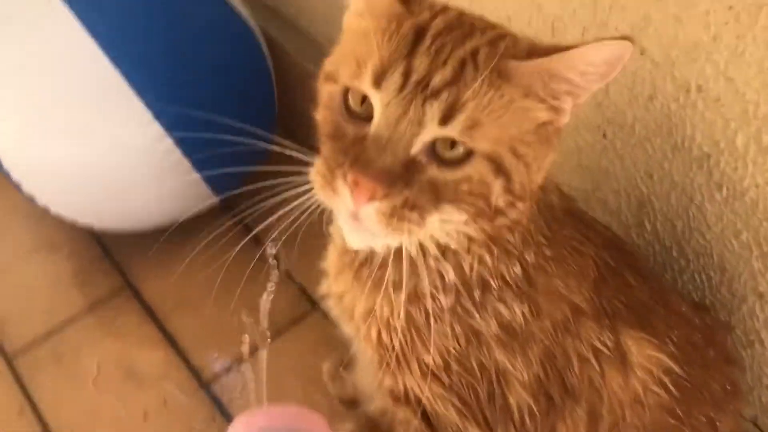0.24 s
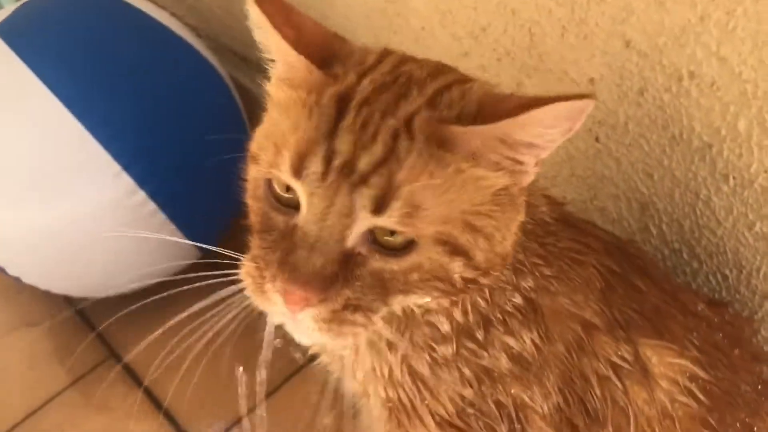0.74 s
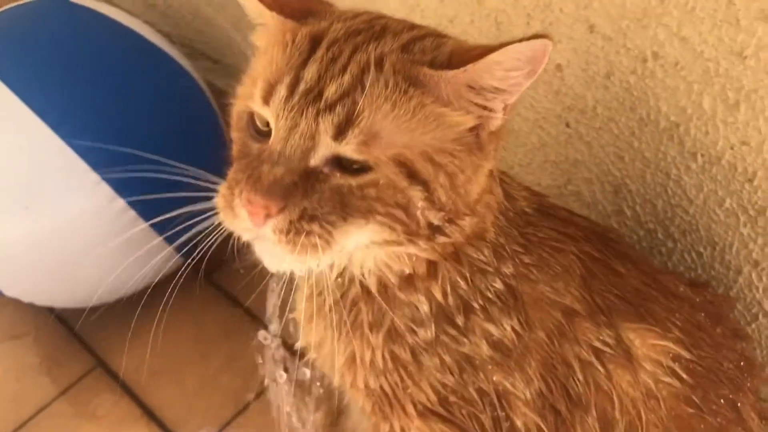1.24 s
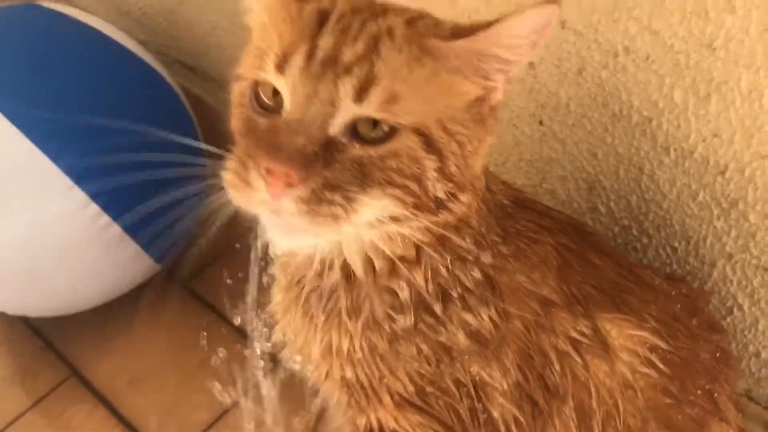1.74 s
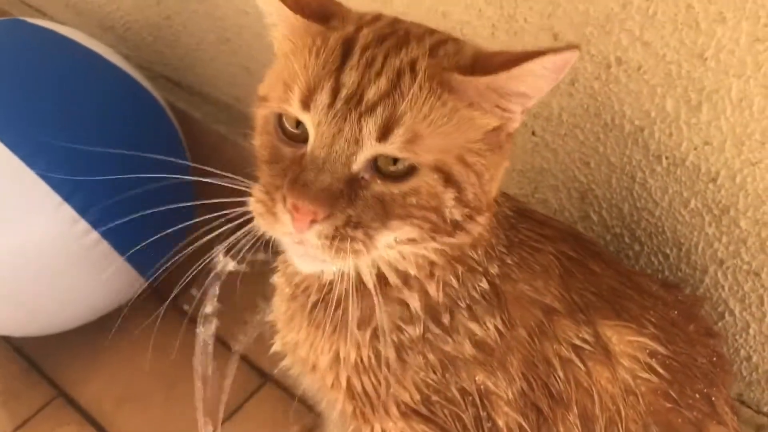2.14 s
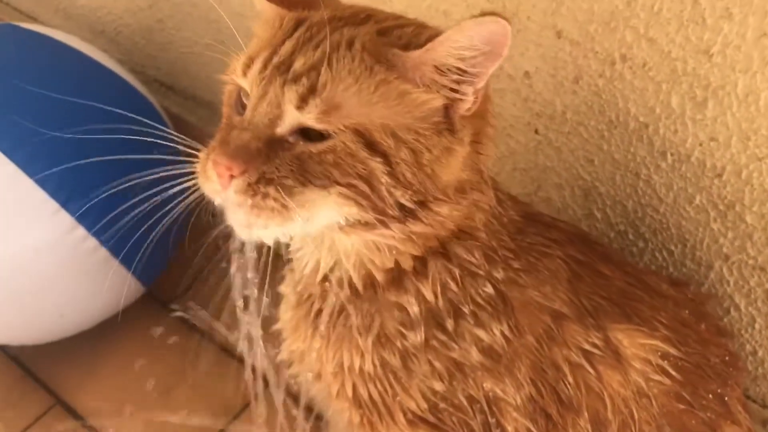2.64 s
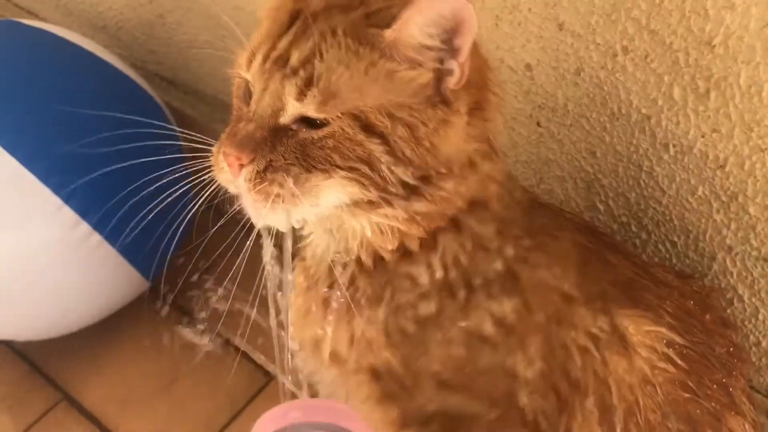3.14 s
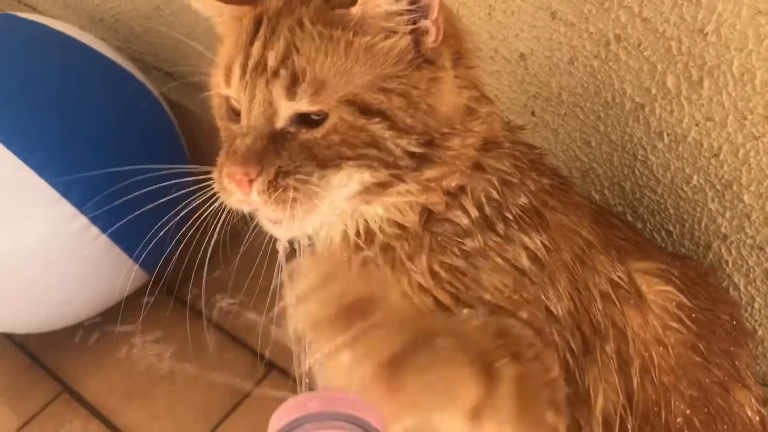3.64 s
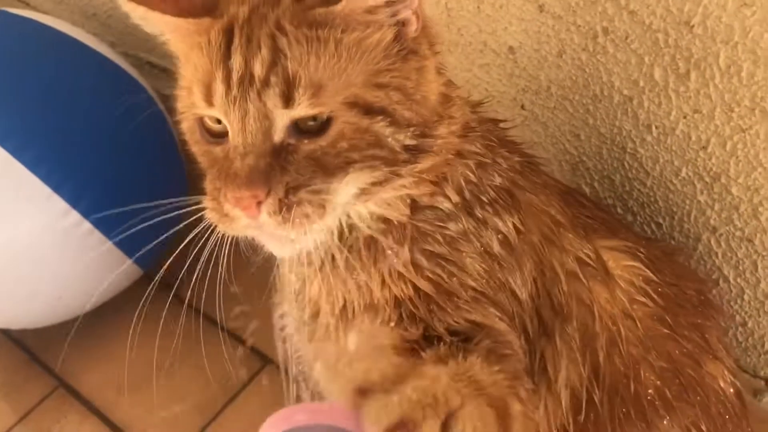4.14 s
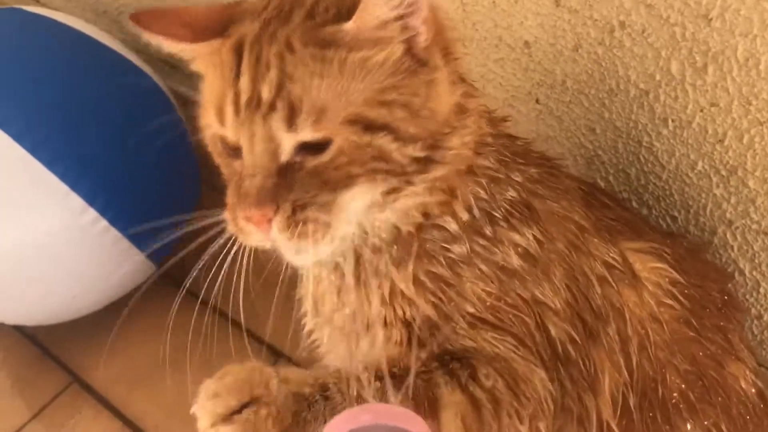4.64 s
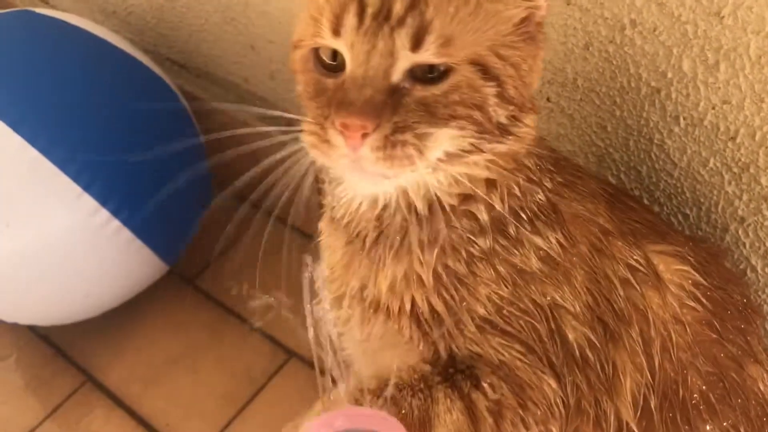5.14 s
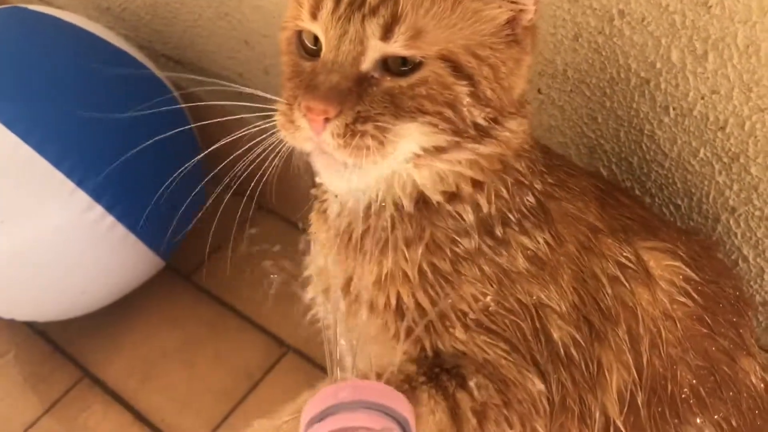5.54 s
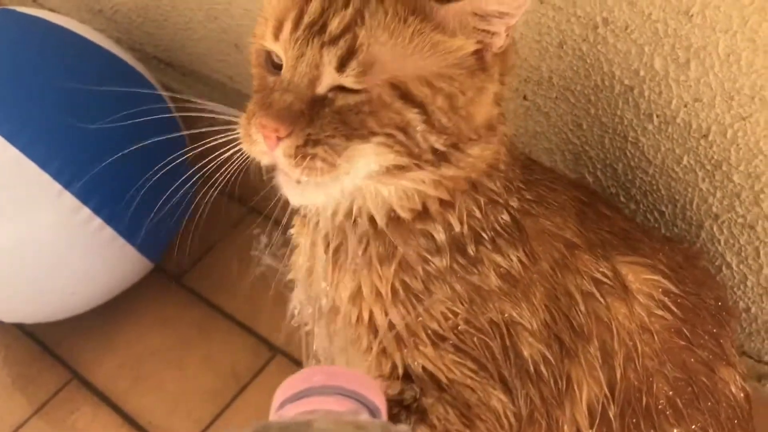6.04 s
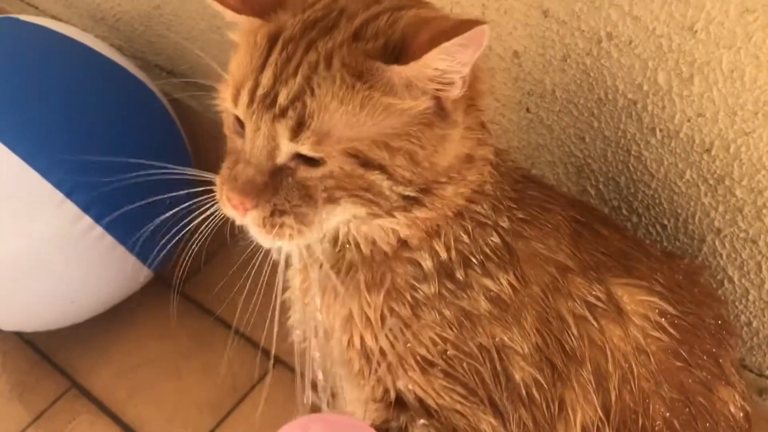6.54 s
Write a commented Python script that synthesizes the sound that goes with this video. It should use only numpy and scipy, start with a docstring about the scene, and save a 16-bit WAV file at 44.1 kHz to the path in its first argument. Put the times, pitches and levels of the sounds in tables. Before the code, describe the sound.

In an outdoor patio corner, a close mono microphone picks up a plastic bottle crackling sparsely as a hand squirts water from it. Light, bright drop ticks, a few tiny bubbles and a barely audible hiss accompany the clicks. From about halfway, sharp, slightly hollow pops break in, with a brief finger rub and a short puff of air before the last and strongest pop. A soft, low rumble continues far behind.

```python
"""A thin plastic water bottle, squeezed close to the microphone, squirts at a cat in a patio corner.
Its wall buckles with a few sharp pops and many small crease ticks, and fingers rub on the plastic.
The jets hiss faintly, air puffs through the cap, drops tick nearby and a few bubbles ring.
Tiles and walls answer briefly; a low outdoor rumble lies far behind. One microphone, mono."""
import sys
import numpy as np
from scipy import signal
from scipy.fft import rfft, irfft, next_fast_len
from scipy.io import wavfile
from scipy.ndimage import map_coordinates

SR = 44100
rng = np.random.default_rng(int(sys.argv[2]) if len(sys.argv) > 2 else 0)


def wrap_up_sound(samples):
    """Save the sound to the file named by the first command line argument, as 16-bit audio."""
    columns = np.atleast_2d(samples).T
    # keep every value between -1 and 1, then stretch to whole-number steps
    tamed = np.clip(columns, -1, 1)
    steps = np.round(tamed * 32767).astype(np.int16)
    wavfile.write(sys.argv[1], SR, steps)


N = 299880
RING = SR // 2  # samples that one snap and its echo last

# Dents buckling in the wall. Each row: start in seconds, level in dB, low and high band edge in Hz,
# first note in Hz, its boost in dB, second note in Hz, its width in Hz, its boost in dB,
# hollow after-ring in dB against the pop.
DENTS = [(2.8696, -26.5, 510, 4670, 800, 23.5, 4200, 2590, 16, -26),
         (2.8740, -47, 600, 6000, 860, 17, 6700, 500, 14, -21),
         (4.0424, -44.5, 330, 2400, 1130, 17, 1450, 150, 13, -4),
         (4.1466, -33, 476, 3600, 930, 16.5, 3360, 700, 5, -13),
         (4.1546, -39, 500, 1200, 920, 19, 644, 100, 17, -22),
         (4.6261, -41, 230, 3740, 320, 18, 3010, 1500, 1, -5),
         (4.6402, -19.5, 736, 8000, 288, 21.5, 6550, 498, 9.5, -12.5),
         (5.8250, -58.5, 700, 3000, 1280, 5.5, 1910, 200, -8, -22),
         (6.1964, -12, 290, 9120, 499.6, 10, 4054, 170, 14, -20.5),
         (6.6687, -52.5, 910, 3200, 1186, 15, 3400, 300.5, 11.5, -30)]


def pops(lag_s=.00125, crack_db=-18, shudder_db=-13, echo_db=-21.5):
    """A dent flips through: an impulse rings the wall, which shudders against the water and the hand."""
    # The bottle's modes. Each row: pitch in Hz, width in Hz, relative level in dB.
    wall_modes = [(190, 90, -12), (310, 100, -9), (405, 60, -6), (535, 60, -8), (645, 55, -6),
                  (870, 120, -4), (1130, 150, -2), (1360, 115, 3), (1760, 105, 1), (2070, 110, -5),
                  (2560, 200, -8), (3370, 160, -8), (4480, 300, -14), (5400, 240, -14), (6250, 340, -14),
                  (6750, 320, -13), (7230, 380, -12), (8830, 360, -16), (10050, 330, -17),
                  (10700, 300, -18), (12100, 400, -26), (13800, 1200, -25)]
    out, hz = np.zeros(N), np.fft.rfftfreq(RING, 1 / SR)
    # bending waves disperse: the treble arrives first, 1 kHz after lag_s
    travel = np.exp(-4j * np.pi * lag_s * np.sqrt(1000 * hz))
    wall = travel * sum(amp(db) * resonance(hz, centre, width) for centre, width, db in wall_modes)
    for s, db, low_hz, high_hz, note_hz, note_db, second_hz, second_width, second_db, hollow_db in DENTS:
        first_note = (amp(note_db) - 1) * resonance(hz, note_hz, .14 * note_hz)
        second_note = (amp(second_db) - 1) * resonance(hz, second_hz, second_width)
        ring = sized(irfft(wall * (1 + first_note + second_note), RING))
        crack = sized(filtered(burst(t60=.02, attack_s=.00028), lambda f: 1 / (1 + 1j * f / 3500)))
        pop = sized(filtered(ring + amp(crack_db) * crack, lambda f: band(f, low_hz, high_hz)))
        smeared = signal.fftconvolve(pop, burst(t60=.06, attack_s=.0037))[:RING]
        shudder = filtered(smeared, lambda f: band(f, 200, 1900))
        # the air and water inside boom briefly
        hollow = sized(filtered(burst(t60=.17, attack_s=.0026), lambda f: band(f, 250, 280)))
        direct = pop + amp(shudder_db) * shudder + amp(hollow_db) * hollow
        # the patio hears the bottle from all sides, so much of its answer has a smooth colour
        all_round = sized(irfft(band(hz, .64 * low_hz, .83 * high_hz) / (1 + 1j * hz / 1900), RING))
        answer = amp(-1) * patio_echo(all_round) + amp(-4.5) * patio_echo(pop)
        add(out, s, amp(db) * (direct + amp(echo_db) * answer))
    return out


def thumps(pitch_hz=150, t60=.038, against_pop_db=-22):
    """Each dent shoves the air once: a low, soft thump under the pop."""
    out, t = np.zeros(N), np.arange(RING) / SR
    push = sized(np.sin(2 * np.pi * pitch_hz * t) * amp(-60 * t / t60))
    for s, db, *_ in DENTS:
        add(out, s, amp(db + against_pop_db) * push)
    return out


def creases(strain_s=.2, strain_db=-53, strain_hz=6200, echo_db=-10.5):
    """Small folds in the plastic click; two faint ticks lead up to each pop as the wall strains."""
    # Snapping folds. Each row: start in seconds, level in dB, pitch in Hz, width in octaves.
    folds = [(0.578, -35.5, 10400, .34), (1.032, -23.5, 7140, 0.46), (1.675, -38.5, 8740, .19),
             (1.906, -47, 6360, 0.39), (2.5203, -26, 6430, 0.32), (2.9918, -38.5, 5040, .23),
             (3.0001, -32, 7260, 0.65), (3.8177, -25.5, 6500, 0.3), (3.997, -42, 4330, .08),
             (4.011, -36, 4350, .06), (4.136, -41, 4570, .79), (4.145, -34.5, 7000, .5),
             (4.2824, -37.5, 9980, .46), (5.553, -41.5, 8200, 0.13), (5.907, -43, 6000, 0.48),
             (6.599, -42.5, 8000, .2)]
    out = np.zeros(N)
    for s, db, pitch_hz, octaves in folds:
        add(out, s, amp(db) * tick(pitch_hz, octaves, t60=.01, skirt_db=-13, echo_db=echo_db))
    for pop_s, *_ in DENTS:
        for lead_s, (size, detune) in zip(rng.uniform(0, strain_s, 2), rng.standard_normal((2, 2))):
            pitch_hz = strain_hz * 2 ** (.25 * detune)
            click = tick(pitch_hz, octaves=.18, t60=.008, skirt_db=-14.5, echo_db=echo_db)
            add(out, pop_s - lead_s, amp(strain_db + 3 * size) * click)
    return out


def drops(spray_count=70, spray_db=-54):
    """Large drops land near the microphone as dry, bright ticks; finer spray falls at random."""
    # Large drops. Each row: start in seconds, level in dB, pitch in Hz.
    landings = [(1.3546, -41, 14200), (1.644, -39, 15000), (2.035, -41, 11100), (3.023, -38, 14800),
                (3.16, -45, 12000), (4.1737, -37, 14200), (4.3211, -32, 11300), (5.422, -39.5, 12500),
                (5.6335, -38, 14000), (5.8244, -31.5, 14940), (6.4112, -28.5, 14300), (6.682, -44, 14700)]
    out = np.zeros(N)
    for s, db, pitch_hz in landings:
        add(out, s, amp(db) * tick(pitch_hz, octaves=.32, t60=.007, skirt_db=-5, echo_db=-16))
    for s, size in zip(rng.uniform(0, (N - 1) / SR, spray_count), rng.standard_normal(spray_count)):
        droplet = tick(pitch_hz=13600, octaves=.31, t60=.004, skirt_db=-20, echo_db=-17.5)
        add(out, s, amp(spray_db + 3 * size) * droplet)
    return out


def bubbles(t60=.018, attack_s=.00092, rise=9, gain_db=-3):
    """Each small bubble in the water rings briefly, its pitch rising."""
    # Bubbles. Each row: start in seconds, relative level in dB, starting pitch in Hz.
    blips = [(0.288, -47, 2430), (2.5506, -49, 2060), (4.2463, -46.5, 2630), (4.373, -46, 2170)]
    out, t = np.zeros(N), np.arange(RING) / SR
    envelope = amp(-60 * t / t60) * (1 - np.exp(-t / attack_s))
    for s, db, pitch_hz in blips:
        blip = np.sin(2 * np.pi * pitch_hz * t * (1 + rise * t)) * envelope
        add(out, s, amp(db + gain_db) * (blip + amp(-22) * patio_echo(blip)))
    return out


def jets(steady_grip_db=-76.5):
    """Water hisses from the holes in the cap, louder as each squeeze raises the pressure."""
    # Harder squeezes. Each row: start in seconds, length in seconds, level the hiss rises toward in dB.
    squeezes = [(2.4, 0.71, -72), (4.1, 0.26, -67), (5.05, 0.3, -73), (6.2, 0.37, -63)]
    # Colour of the hiss. Each row: frequency in Hz, relative level in dB.
    jet_colour = [(800, -19.5), (2500, -4.5), (6000, -4), (9000, -6), (10500, -5), (12500, 1.5),
                  (16000, -8.5)]
    surges = [amp(db) * swell(s, length, attack_s=.11, release_s=.04) for s, length, db in squeezes]
    flow = np.sqrt(amp(steady_grip_db) ** 2 + sum(surge ** 2 for surge in surges))
    return flow * coloured(rng.standard_normal(N) * amp(1.5 * wobble(95)), jet_colour)


def air_puff(start_s=4.934, level_db=-47, t60=.5):
    """Air bursts through the cap once and fades as the pressure evens out."""
    # Colour of the puff. Each row: frequency in Hz, relative level in dB.
    puff_colour = [(400, -27), (700, 1), (1000, -11.5), (1300, -7.5), (1700, -19.5), (2300, 0.5),
                   (2750, -11), (3200, -5.5), (4000, -3.5), (4900, -9.5), (6100, -3.5), (7600, -12.5),
                   (12000, -16), (15500, -23)]
    envelope = swell(start_s, hold_s=0, attack_s=.001, release_s=t60 / np.log(1000))
    return amp(level_db) * envelope * coloured(rng.standard_normal(N), puff_colour)


def fingers(rough_db=4, grow_s=.02, stop_s=.007):
    """The grip shifts on the plastic in clumps of tiny slips that grow until the fingers catch."""
    # Finger slides. Each row: moment of the catch in seconds, level in dB.
    slides = [(4.046, -48), (4.236, -58.5)]
    # Colour of the rubbing. Each row: frequency in Hz, relative level in dB.
    rub_colour = [(150, -25), (350, 4.5), (1300, 0.5), (2600, -5), (4300, -9), (5500, -19), (9000, -12.5),
                  (16000, -22)]
    t = np.arange(N) / SR
    envelope = sum(amp(db) * np.exp(np.minimum((t - s) / grow_s, (s - t) / stop_s)) for s, db in slides)
    return envelope * coloured(rng.standard_normal(N) * amp(rough_db * wobble(450)), rub_colour)


def patio_echo(x, first_s=.0055, wall_s=.029, wall_width_s=.0096, wall_db=8):
    """The corner answers with a short diffuse tail and a cluster of reflections from the walls."""
    # The patio's decay. Each row: frequency in Hz, time to fall 60 dB in seconds.
    decay_times = [(150, 0.76), (1000, 0.39), (5000, 0.39), (9000, 0.44), (15000, 0.3)]
    hz, t, noise = signal.stft(rng.standard_normal(RING), SR, nperseg=256)
    decay = amp(-60 * t / along(decay_times, hz)[:, None])
    tail = signal.istft(noise * decay, SR, nperseg=256)[1][:RING]
    t = np.arange(RING) / SR
    wall_cluster = amp(wall_db * np.exp(-((t - wall_s) / wall_width_s) ** 2))
    tail = tail * (t > first_s) * wall_cluster
    return signal.fftconvolve(x, tail / np.linalg.norm(tail))[:RING]


def outdoors(rumble_db=-54, air_db=-66):
    """A low, distant rumble under smooth, faint air."""
    # Colours of the rumble and the air. Each row: frequency in Hz, relative level in dB.
    rumble_colour = [(12, -61), (20, -23.5), (32, -15.5), (35, -14.5), (48, -3), (75, 2), (135, -1),
                     (166, -7.5), (195, -3.5), (222, -9.5), (369, -13.5), (426, -17.5), (499, -19),
                     (624, -14.5), (900, -22), (1170, -58), (1980, -120)]
    air_colour = [(530, -32.5), (900, -0.5), (1230, -1.5), (1310, -4.5), (1530, -5.5), (1920, -8),
                  (2500, -8), (4250, -10.5), (5480, -14), (6890, -15.5), (7580, -22), (8550, -16.5),
                  (10500, -26.5), (11400, -22.5), (16000, -23)]
    rumble = amp(rumble_db + .8 * wobble(12)) * coloured(rng.standard_normal(N), rumble_colour)
    air = amp(air_db + .34 * wobble(1.9)) * coloured(rng.standard_normal(N), air_colour)
    return rumble + air


def tick(pitch_hz, octaves, t60, skirt_db, echo_db):
    """A very short burst of micro-snaps around one pitch, with its echo."""
    def colour(hz):
        """A flat-topped band on a broad skirt."""
        away = np.log2((hz + 1) / pitch_hz)
        return 1 / np.sqrt(1 + (away / octaves) ** 6) + amp(skirt_db) * np.exp(-away ** 2)

    snaps = np.roll(burst(t60, attack_s=.0001), SR // 1000)
    click = filtered(snaps + amp(echo_db) * patio_echo(np.ones(1)), colour)
    return amp(10) * click / np.linalg.norm(click)


def burst(t60, attack_s):
    """Noise of energy 1 that swells and dies away."""
    t = np.arange(RING) / SR
    x = rng.standard_normal(RING) * amp(-60 * t / t60) * (1 - np.exp(-t / attack_s))
    return x / np.linalg.norm(x)


def swell(start_s, hold_s, attack_s, release_s):
    """Gain per sample that rises from start_s and falls away once hold_s has passed."""
    t = np.maximum(np.arange(N) / SR - start_s, 0)
    return (1 - np.exp(-t / attack_s)) * np.exp(-np.maximum(t - hold_s, 0) / release_s)


def wobble(rate):
    """A smooth random curve, rate knots a second."""
    return map_coordinates(rng.standard_normal(int(N * rate / SR) + 4), [np.arange(N) * rate / SR])


def resonance(hz, centre, width):
    """Causal response of one mode."""
    return 1j * hz * width / (centre ** 2 - hz ** 2 + 1j * hz * width)


def band(hz, low_hz, high_hz):
    """Causal response that falls 12 dB an octave below low_hz and 18 dB an octave above high_hz."""
    u, v = 1j * hz / low_hz, 1j * hz / high_hz
    return u * u / (1 + np.sqrt(2) * u + u * u) / ((1 + v) * (1 + v + v * v))


def filtered(x, response):
    """x through a complex response of frequency."""
    size = next_fast_len(len(x) + 8192)
    return irfft(rfft(x, size) * response(np.fft.rfftfreq(size, 1 / SR)), size)[:len(x)]


def coloured(x, spectrum):
    """x shaped by (Hz, dB) points, at rms 1."""
    shaped = filtered(x, lambda hz: amp(along(spectrum, hz)))
    return shaped / np.sqrt(np.mean(shaped ** 2) + 1e-30)


def along(points, hz):
    """Interpolate (Hz, value) points on a log frequency axis."""
    knots_hz, values = np.transpose(points)
    return np.interp(np.log(hz + 1), np.log(knots_hz + 1), values)


def sized(x):
    """Scale a sound to the energy of 10 ms at rms 1."""
    return x / np.sqrt(np.sum(x ** 2) / (SR / 100))


def amp(db):
    """Decibels to gain."""
    return 10 ** (np.asarray(db) / 20)


def add(track, s, x):
    """Mix x into the track from time s."""
    part = track[round(s * SR):][:len(x)]
    part += x[:len(part)]


def scene():
    """The bottle close up and the open air behind it, at one microphone."""
    plastic = pops() + thumps() + creases()
    water = drops() + bubbles() + jets()
    return (plastic + water + air_puff() + fingers() + outdoors())[None]


def record(dry, ceiling=.95, top_hz=16000):
    """The recorder rounds off the highest peak and cuts steeply above its band limit."""
    rounded = dry[0] / (1 + np.abs(dry[0] / ceiling) ** 6) ** (1 / 6)
    return filtered(rounded, lambda hz: 1 / np.sqrt(1 + (hz / top_hz) ** 120))[None]


dry = scene()
out = record(dry)
wrap_up_sound(out)
```